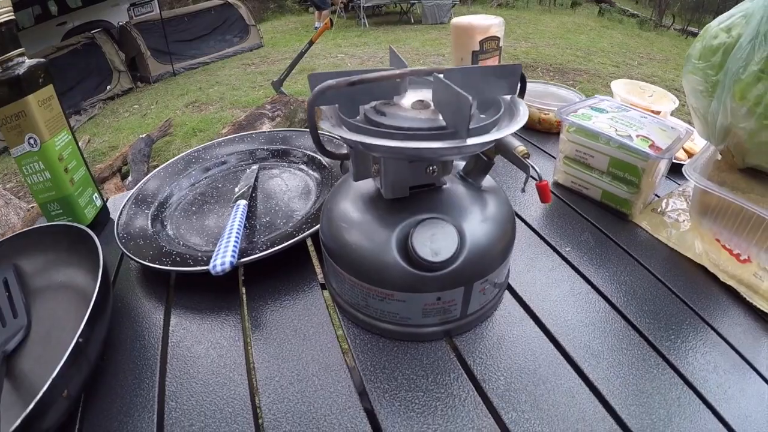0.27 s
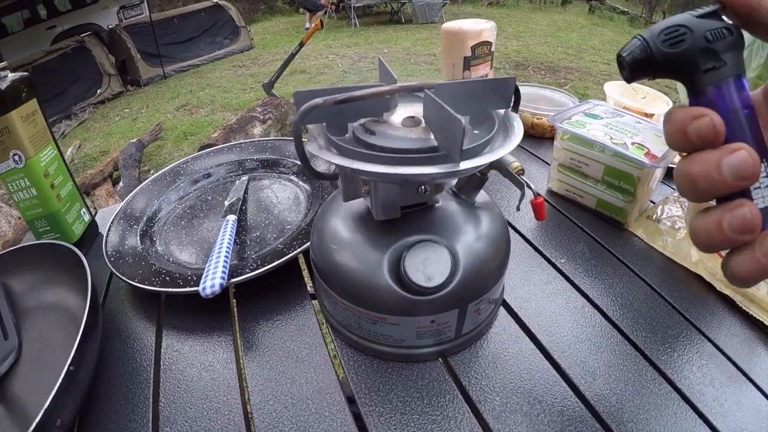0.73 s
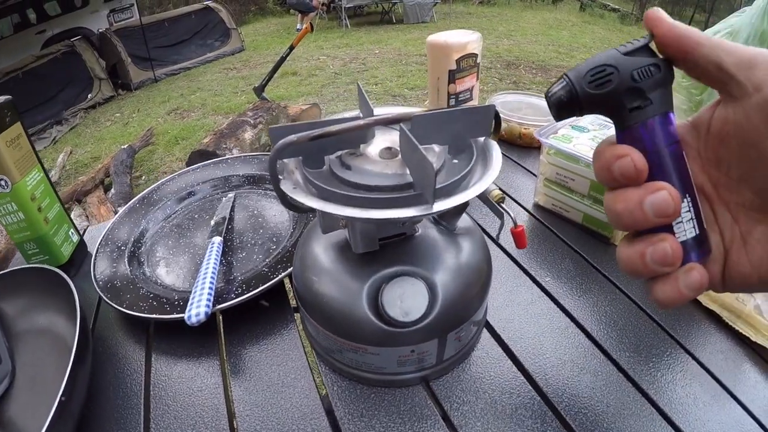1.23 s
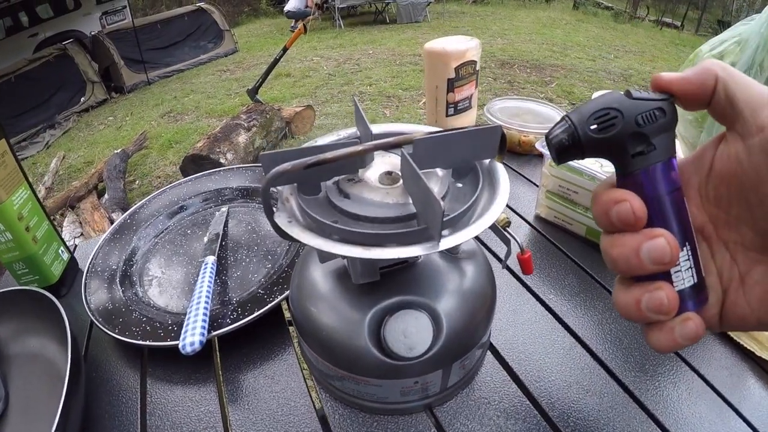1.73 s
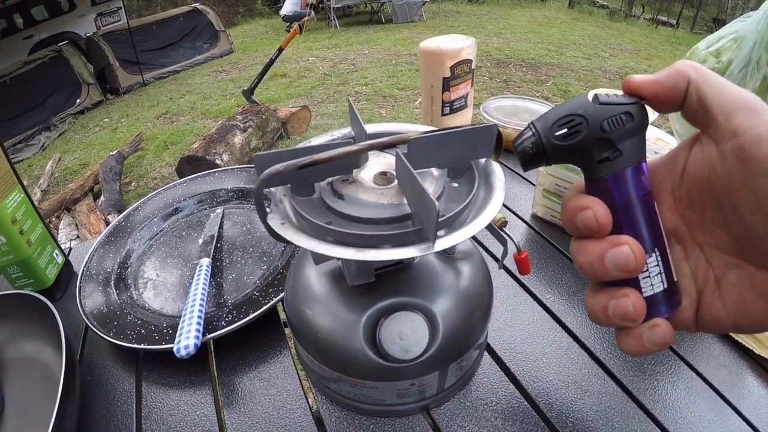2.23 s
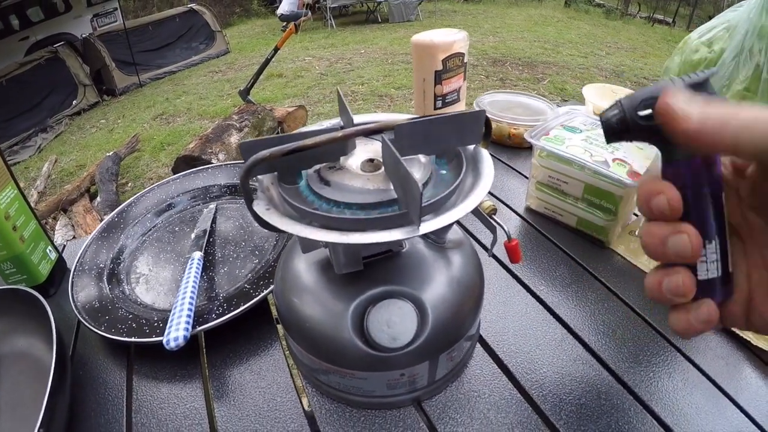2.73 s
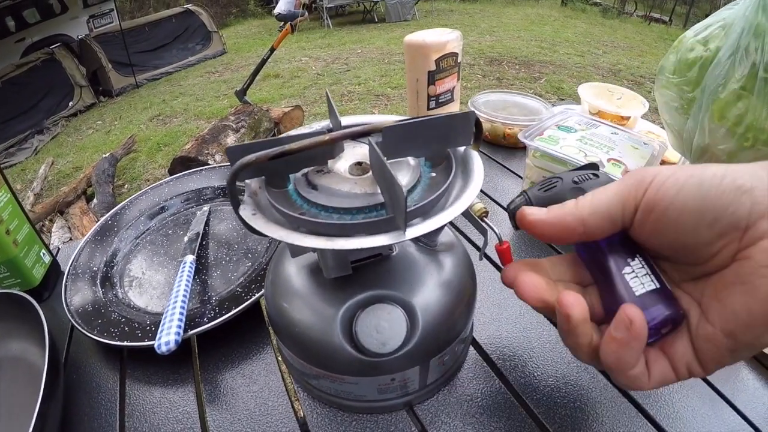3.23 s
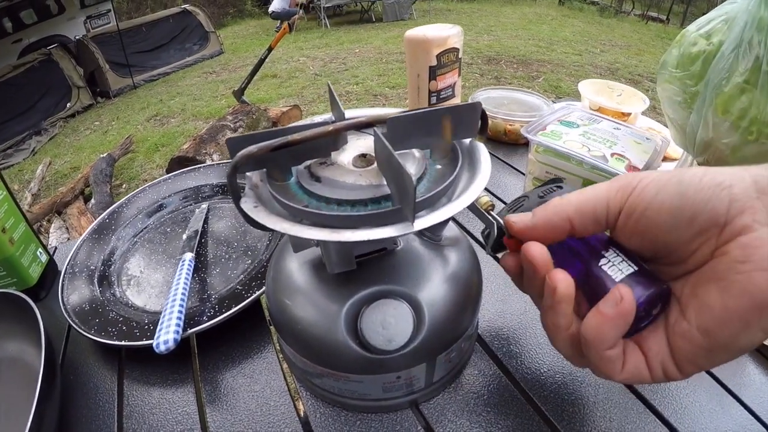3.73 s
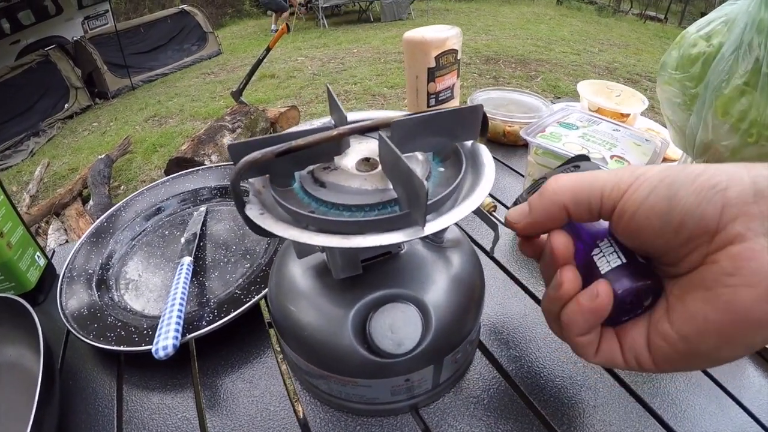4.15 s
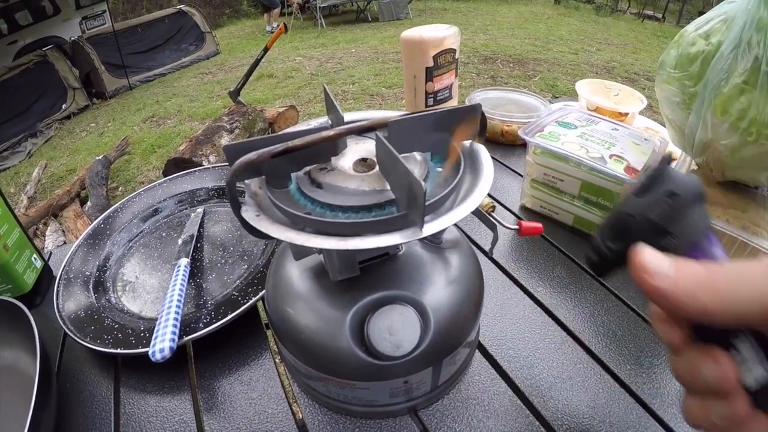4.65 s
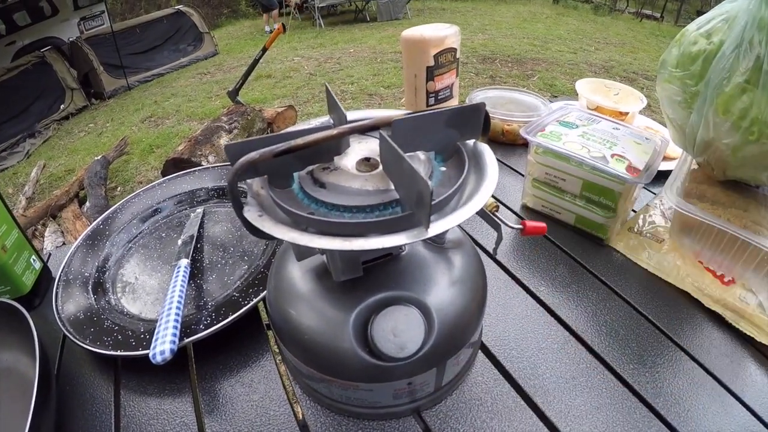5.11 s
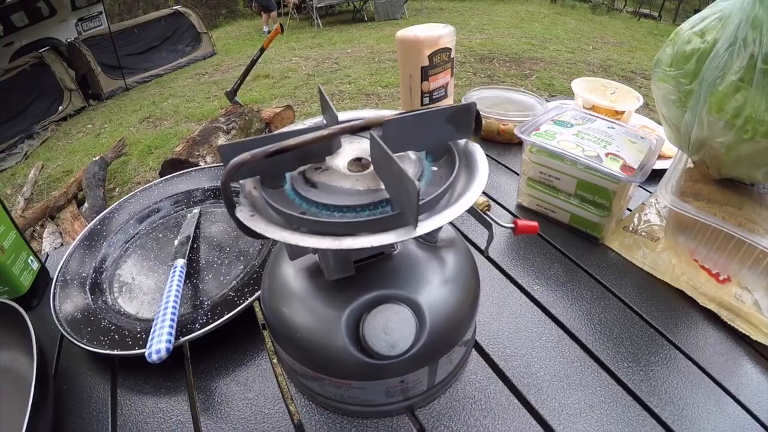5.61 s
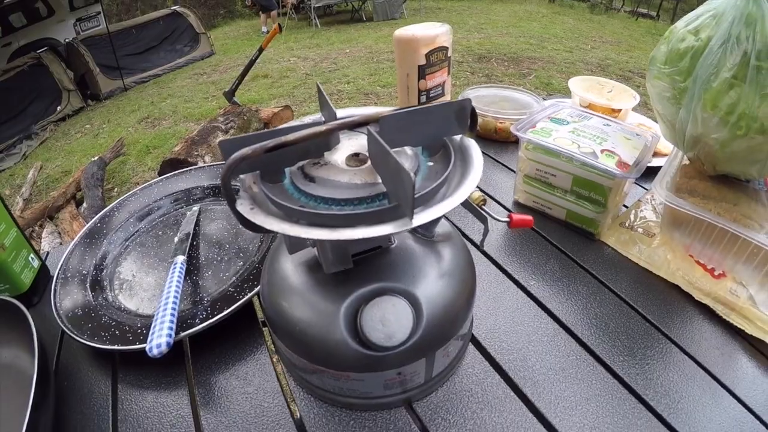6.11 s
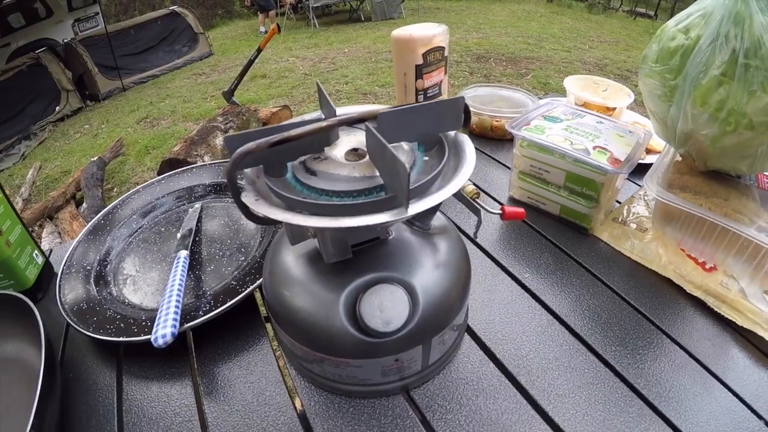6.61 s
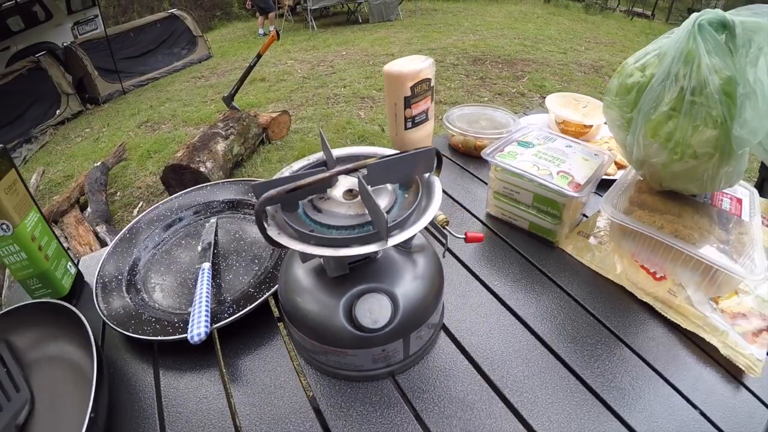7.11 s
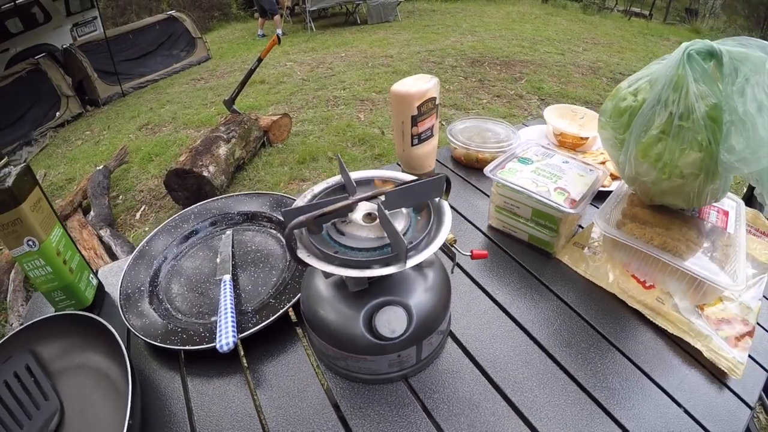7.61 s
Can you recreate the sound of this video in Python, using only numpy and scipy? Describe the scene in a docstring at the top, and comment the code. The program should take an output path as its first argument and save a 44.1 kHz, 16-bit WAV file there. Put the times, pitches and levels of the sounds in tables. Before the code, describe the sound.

Outdoors, very near a hand-held microphone, a camp stove lets out a continuous, slightly sputtering gas hiss over low hand rumble and a light breeze. Two crisp lighter clicks snap, then the burner lights with a dull puff and settles into a low flutter. The hiss sharpens briefly as the valve is turned. Finally the microphone moves away, the flame grows quieter, and a few soft handling knocks sound.

```python
"""A gas camping stove on a slatted table, close to a hand-held camera's microphone, nearly mono.
From the start gas hisses from the nozzle, swelling in places; the hand rumbles, air brushes past.
At 1.0 and 1.4 s a jet lighter clicks beside the burner, and the camera's limiter ducks after the clicks.
At 2.3 s the gas catches with a puff and burns on with a low flutter; near 4 s the valve is turned.
From 6.8 s the camera draws back, the flame fades, and fingers knock on the case."""
import sys
import numpy as np
from scipy import signal
from scipy.fft import rfft, irfft, next_fast_len
from scipy.io import wavfile
from scipy.ndimage import uniform_filter1d, minimum_filter1d, map_coordinates

SR = 44100
rng = np.random.default_rng(int(sys.argv[2]) if len(sys.argv) > 2 else 0)


def log_audio(samples):
    """Write samples as a 16-bit WAV file to the path given in sys.argv[1]."""
    # one column per channel
    frames = np.atleast_2d(samples).T
    # limit to full scale, then quantise
    limited = np.clip(frames, -1, 1)
    pcm = np.round(limited * 32767).astype(np.int16)
    wavfile.write(sys.argv[1], SR, pcm)


N = 346626
TIME = np.arange(N) / SR

# escaping gas at the microphone, before each layer's trim: (time [s], rush [dB], jet [dB], fizz [dB])
GAS_LEVELS = [(0.0, -38.5, -33, -52.5), (0.4, -37, -31.5, -50.5), (0.62, -37.5, -34, -52),
              (0.92, -36.5, -31, -52.5), (1.15, -39.5, -31, -50.5), (1.4, -38, -33.5, -53.5),
              (1.84, -37.5, -36, -52.5), (2.3, -38.5, -32, -52.5), (2.48, -39.5, -38, -54),
              (2.62, -41, -34.5, -52), (2.9, -41, -37, -54), (3.46, -44, -39, -55), (4.07, -42, -35.5, -55),
              (4.31, -43, -36, -53.5), (4.77, -44, -37, -56.5), (5.23, -44, -38, -56),
              (5.82, -40.5, -38, -55.5), (6.22, -41.5, -39.5, -53.5), (6.55, -41.5, -40, -56.5),
              (6.89, -41.5, -38.5, -56), (7.49, -44, -43.5, -59), (7.86, -46, -42, -59)]
# the mixing tube's hum, strongest with the microphone close to the burner: (time [s], level [dB])
HUM_LEVELS = [(0, -51), (.6, -52), (1.2, -51), (1.7, -47.5), (2.3, -45.5), (3.2, -49), (5.6, -48.5),
              (7.0, -53.5), (7.86, -50)]
# the colours of the gas, each (frequency [Hz], relative density [dB])
TUBE_SPECTRUM = [(1120, -17.5), (1300, 1.5), (1440, 4), (1600, 0.5), (1750, -8), (2100, -42)]  # the mixing tube's main resonance
HUM_SPECTRUM = [(220, -1.5), (330, -8.5), (390, -4), (490, -14.5), (545, -25), (600, -25), (650, -20),
                (720, -12.5), (950, -14), (1120, -25)]  # its low hum
RUSH_SPECTRUM = [(1550, -27), (1800, -0.5), (2000, 4), (2400, 1.5), (2750, -2), (3050, 0.5), (3350, -4),
                 (3650, 1), (4300, -2), (5200, -14)]  # the broad rush
JET_SPECTRUM = [(3600, -60), (4300, -12), (4600, 0.5), (5400, 1.5), (5950, 1), (6250, -3.5), (6600, -4.5),
                (7200, -15), (8500, -54)]  # the nozzle's hiss
FIZZ_SPECTRUM = [(6000, -23), (7200, 4.5), (7900, 6.5), (9300, 1), (10050, 6), (10700, -5), (12500, -2.5),
                 (13400, -10), (14400, -3), (15250, -1.5)]  # the fizz above it
SIDE_FIZZ_SPECTRUM = [(9500, -30), (11000, -10), (12500, 7), (13500, 2), (15200, 8)]  # the highest fizz, which differs between left and right
VALVE_SPECTRUM = [(6500, -27), (6950, -1), (7550, -2), (8000, -2), (8900, -24), (13500, -30), (14300, -13),
                  (15200, -14)]  # the valve's thin hiss
# the jet's brightest ring, heard from the camera: (time [s], centre [Hz], strength [0-1])
JET_RING = [(0, 5330, 0.7), (.45, 5320, 0.6), (.65, 5480, 0.1), (.95, 5440, 0.8), (1.3, 5320, 0.8),
            (1.6, 5240, 0.5), (1.85, 5650, 0.3), (2.15, 5800, 1), (2.7, 5680, 0.5), (3.0, 5530, 0.1),
            (4.2, 5480, 0.5), (4.7, 5900, 0.13), (5.3, 5600, 0.4), (5.9, 5400, 0.2), (6.8, 5470, 0.1),
            (7.3, 5420, 0.6), (7.86, 5650, 0.5)]
# short paths off table and pan support: (time [s], first delay [ms], second delay [ms], strength [0-1])
TABLE_ECHOES = [(0, 0.97, 1.27, 0.09), (1.3, 0.76, 1.15, 0), (2.1, 0.94, 0.98, 0.09),
                (3.5, 0.94, 1.24, 0.04), (4.5, 0.685, 1.07, 0), (6.2, 0.91, 1.09, 0.07),
                (7.86, 0.89, 1.38, 0.17)]
# bands that reflections cancel: (middle [s], length [s], centre [Hz], half-width [Hz], depth [0-1])
HISS_NOTCHES = [(.6, 2.4, 4740, 110, 0.63), (.7, 1.3, 3440, 200, 0.53), (2.1, 0.86, 5140, 200, 0.15),
                (3.7, 1.6, 6200, 170, .35), (5.4, 3.2, 4400, 130, 0.27), (6.2, 2.5, 3270, 150, 0.35),
                (6.95, 1.16, 4140, 170, 0.6)]
# bands of the hiss that swell and fade: (middle [s], length [s], level [dB], centre [Hz], width [Hz])
NOZZLE_SWELLS = [(.2, 2.2, -43, 2790, 450), (0.415, 0.13, -29, 5490, 231.5), (2.655, 0.14, -31, 5650, 710),
                 (2.75, 0.066, -30, 5650, 220), (3.374, 0.28, -37.5, 5480, 300),
                 (3.797, 1.3, -47.5, 3040, 190), (4.69, 0.18, -43, 3985, 35), (6.788, 0.16, -36, 5560, 500),
                 (7.77, .14, -42.5, 5700, 400)]

# the hand's rumble on the camera: (frequency [Hz], relative density [dB])
GRIP_SPECTRUM = [(8, -13), (20, 4.5), (35, 2.5), (52, 2), (75, 2), (100, -9.5), (150, -33), (300, -42)]
# the hand shifts and the drone swells: (middle [s], length [s], level [dB], pitch [Hz])
GRIP_SHIFTS = [(0.338, 0.37, -23, 52.2), (0.994, 0.15, -18, 58), (1.102, 0.24, -21, 50),
               (1.355, 0.31, -26.5, 72.7), (2.232, 0.19, -21, 56.5), (4.87, 0.2, -24, 48.5),
               (5.566, 0.14, -17.5, 48.94), (6.013, 0.28, -18.5, 47.1), (6.745, 0.29, -20, 48)]
# air on the microphone: (frequency [Hz], relative density [dB])
BREEZE_SPECTRUM = [(50, -9), (85, 0.5), (120, -2), (170, -6), (240, -21), (400, -25.5)]
# its separate puffs: (time [s], level [dB])
BREEZE_PUFFS = [(.1, -36), (.18, -36), (.39, -36), (.56, -37.5), (.84, -38), (.9, -35), (1.0, -28.5),
                (1.11, -35), (1.55, -32), (1.62, -35.5), (1.86, -31), (1.95, -31), (2.06, -32), (2.23, -37)]
# knocks on the camera's case: (time [s], level [dB])
CASE_KNOCKS = [(0.093, -34), (7.506, -21.5), (7.666, -22), (7.799, -33)]
# the case's resonances: (frequency [Hz], level [dB], t60 [s])
CASE_MODES = [(169, -4, .05), (369, 2.5, 0.048), (730, -2, 0.022), (960, -9, 0.03)]
# dull pushes of air and hand: (time [s], level [dB], pitch [Hz], t60 [s], rise [s])
DULL_THUMPS = [(0.099, 0, 47.7, 0.082, 0.011), (0.817, -8.5, 55, 0.098, 0.0059),
               (1.434, 3, 74, 0.082, 0.004), (2.263, -3, 60, 0.067, 0.0066),
               (2.311, -4.5, 76.6, 0.1, 0.0085), (2.315, -14.5, 200, 0.037, 0.0038),
               (2.395, 8, 66.4, 0.049, 0.0089), (7.347, 2.5, 68, 0.16, 0.019),
               (7.666, -8.5, 81, .06, 0.0047), (7.701, -13, 61, 0.098, 0.0064)]

# the lighter's trigger is pressed:
# (snap time [s], snap level [dB], housing level [dB], slide peak [s], slide level [dB], rise [dB/s])
TRIGGER_PRESSES = [(0.966, 5, -15, 0.962, -11.5, 900), (1.4352, 6, -5.5, 1.4295, -13, 1300)]
# the sliding trigger's squeak: (pitch [Hz], waver [Hz], level [dB])
SQUEAK_TONES = [(4260, 200, -6), (5230, 90, 0.5), (6100, 198, -13), (7500, 230, -21), (8930, 160, -14)]
# the snap's dry crack: (frequency [Hz], relative density [dB])
CRACK_SPECTRUM = [(1300, -14), (2000, -4.5), (3000, -4), (4000, -2), (5500, 2), (7000, 3.5), (9000, -1.5),
                  (10200, -9.5), (12000, -21), (15000, -25)]
# the lighter's metal nozzle and plastic housing, each (frequency [Hz], level [dB], t60 [s])
LIGHTER_NOZZLE_MODES = [(4360, -17, 0.041), (5250, -2.5, 0.028), (6040, -10, 0.026), (7040, -17, 0.02),
                        (7900, -20, .02), (8860, -14.5, 0.025)]
HOUSING_MODES = [(400, -23, .018), (1950, -10, 0.009), (2690, -1, 0.0088), (3330, -4, 0.012)]
# the trigger is let go: (time [s], level [dB])
TRIGGER_RELEASES = [(1.1906, -11.5), (2.571, -12.5)]
# its small returning tick: (frequency [Hz], relative density [dB])
TICK_SPECTRUM = [(1300, -10), (1800, 0), (2800, -15), (4000, -6), (4700, -16), (5600, 8), (7000, -12),
                 (8100, -5), (9500, -21), (14000, -34)]
# the flame's low roar: (frequency [Hz], relative density [dB])
FLAME_SPECTRUM = [(25, -14), (60, -6.5), (110, -2), (190, -0.5), (240, -5.5), (300, -13.5), (350, -17.5),
                  (400, -16.5), (450, -26), (505, -25), (550, -49), (600, -37.5), (680, -33), (900, -43),
                  (1200, -65)]

LEAD = 64  # samples of room for a crack's soft onset


def amp(db):
    """Decibels to amplitude."""
    return 10 ** (np.asarray(db) / 20)


def unit(x):
    """x scaled to rms 1."""
    return x / np.sqrt(np.mean(x ** 2) + 1e-20)


def along(points, hz):
    """(frequency [Hz], level [dB]) points joined on a log axis, silent far beyond both ends."""
    f, db = np.transpose(points)
    edges = np.r_[f[0] / 2, f, f[-1] * 2]
    return np.interp(np.log(hz + 1), np.log(edges), np.r_[-120, db, -120])


def curves(rows, at=TIME):
    """Each column after the time, joined by straight lines."""
    times, *columns = np.transpose(rows)
    return [np.interp(at, times, column) for column in columns]


def wobble(rate):
    """A smooth random curve, rate knots a second."""
    return map_coordinates(rng.standard_normal(int(N * rate / SR) + 4), [TIME * rate])


def swell(middle_s, length_s):
    """A smooth rise and fall, 1 at its middle."""
    return np.cos(np.pi * np.clip((TIME - middle_s) / length_s, -.5, .5))


def filtered(x, response):
    """x through a frequency response."""
    size = next_fast_len(len(x) + 8192)
    return irfft(rfft(x, size) * response(np.fft.rfftfreq(size, 1 / SR)), size)[:len(x)]


def noise(spectrum):
    """Coloured noise of rms 1."""
    return unit(filtered(rng.standard_normal(N), lambda hz: amp(along(spectrum, hz))))


def add(track, s, sound):
    """Mix a sound in at time s."""
    part = track[round(s * SR):][:len(sound)]
    part += sound[:len(part)]


def wavering(hz, waver_hz, rate):
    """A tone of unsteady pitch."""
    return np.sin(2 * np.pi * np.cumsum(hz + waver_hz * wobble(rate)) / SR)


def ringing(modes, t):
    """A struck body's modes, each dying at its own speed."""
    return sum(amp(db - 60 * t / t60) * np.sin(2 * np.pi * hz * t) for hz, db, t60 in modes)


def burst(spectrum, t60):
    """A short coloured crack of noise that starts near rms 1 after LEAD samples."""
    t = np.arange(SR // 20) / SR
    decay = amp(-60 * t / t60)
    white = np.pad(rng.standard_normal(len(t)) * decay, (LEAD, 0))
    crack = filtered(white, lambda hz: amp(along(spectrum, hz)))
    return crack * np.linalg.norm(decay) / np.linalg.norm(crack)


def gas():
    """Close by, gas rushes from the nozzle through the mixing tube; the flow sputters slightly."""
    rush_db, jet_db, fizz_db = curves(GAS_LEVELS)
    hum_db, = curves(HUM_LEVELS)
    sputter = wobble(30)
    drive_db = rush_db + hum_db
    tube_db = -43.5 + 0.45 * (drive_db - drive_db.mean())  # the resonance follows rush and hum
    tube = amp(tube_db + .5 * sputter) * noise(TUBE_SPECTRUM)
    hum = amp(hum_db + .5 * sputter) * noise(HUM_SPECTRUM)
    rush = amp(rush_db + 0.2 + .5 * sputter + 0.19 * wobble(14)) * noise(RUSH_SPECTRUM)
    hiss_gain = amp(jet_db + 0.32 + 0.52 * sputter + 1.42 * wobble(110) + 0.43 * wobble(8.1))
    hiss = hiss_gain * jet(ring_width_hz=150, ring_gain=2.5)
    fizz_gain = amp(fizz_db + 3 + sputter + 1.3 * wobble(22))
    fizz = fizz_gain * noise(FIZZ_SPECTRUM)
    direct = turbulence(tube + hum + rush + hiss + fizz, depth_db=2.0)
    mid = reflection_notches(table_echoes(direct))
    side = amp(-11.5) * fizz_gain * noise(SIDE_FIZZ_SPECTRUM)
    return mid + np.outer([1, -1], side)


def jet(ring_width_hz, ring_gain):
    """The nozzle's hiss with one narrow, wandering resonance."""
    hz, t, bands = signal.stft(noise(JET_SPECTRUM), SR, nperseg=512)
    centre, strength = curves(JET_RING, t)
    lift = 1 + ring_gain * strength / (1 + (2 * (hz[:, None] - centre) / ring_width_hz) ** 2)
    power = amp(along(JET_SPECTRUM, hz))[:, None] ** 2
    lift /= np.sqrt((power * lift ** 2).sum(0) / power.sum())  # the ring adds colour, not power
    return unit(signal.istft(bands * lift, nperseg=512)[1][:N])


def turbulence(x, depth_db, blur_bins=10, blur_frames=14):
    """Turbulence lifts and sinks narrow bands of the hiss for moments."""
    bands = signal.stft(x, nperseg=1024)[2]
    blur = np.outer(np.hanning(blur_bins), np.hanning(blur_frames))
    white = rng.standard_normal(np.add(bands.shape, blur.shape) - 1)
    ripple = unit(signal.fftconvolve(white, blur, "valid"))
    reach = np.minimum(np.linspace(0, 1, len(bands))[:, None] / .13, 1)  # shallower in the low bands
    return signal.istft(bands * amp(depth_db * reach * ripple), nperseg=1024)[1][:N]


def table_echoes(x):
    """Two short echoes off table and pan support comb the hiss; the comb shifts as the camera moves."""
    *delays_ms, strength = curves(TABLE_ECHOES)
    echoes = sum(map_coordinates(x, [np.arange(N) - ms * SR / 1000]) for ms in delays_ms)
    return x + strength * echoes


def reflection_notches(x):
    """Reflections cancel narrow bands of the hiss, each while the microphone stays in one place."""
    for s, length_s, hz, half_width_hz, depth in HISS_NOTCHES:
        band = filtered(x, lambda f: 1 / (1 + ((f - hz) / half_width_hz) ** 4))
        x = x - depth * np.minimum(2 * swell(s, length_s), 1) * band
    return x


def nozzle_swells():
    """Bands of the hiss swell and fade, some as broad airy flares, some as thin whistles."""
    out = np.zeros(N)
    for s, length_s, db, hz, width_hz in NOZZLE_SWELLS:
        band = filtered(rng.standard_normal(N), lambda f: 1 / (1 + ((f - hz) / width_hz) ** 2) ** 2)
        out += amp(db) * swell(s, length_s) * unit(band)
    return out


def grip(rumble_db, drone_db, drone_hz):
    """Handling noise: the hand rumbles on the camera, and a low drone swells whenever it shifts."""
    out = amp(rumble_db + 0.64 * wobble(7.4)) * noise(GRIP_SPECTRUM)
    out += amp(drone_db + 2.9 * wobble(3.2)) * wavering(drone_hz, waver_hz=2.03, rate=12)
    for s, length_s, db, hz in GRIP_SHIFTS:
        out += amp(db) * swell(s, length_s) * wavering(hz, waver_hz=2.03, rate=12)
    return out


def breeze(level_db, puff_s):
    """Light air brushes the microphone, with separate soft puffs."""
    puffs = sum(amp(db) * swell(s, puff_s) for s, db in BREEZE_PUFFS)
    return (amp(level_db + 3.7 * wobble(13)) + puffs) * noise(BREEZE_SPECTRUM)


def knocks_and_thumps(knock_rise_s):
    """Right at the microphone, a soft fingertip rings the case; pushes of air and hand thump dully."""
    out, t = np.zeros(N), np.arange(SR // 4) / SR
    knock = (1 - np.exp(-t / knock_rise_s)) * ringing(CASE_MODES, t)
    for s, db in CASE_KNOCKS:
        add(out, s, amp(db) * knock)
    for s, db, hz, t60, rise_s in DULL_THUMPS:
        onset = 1 - np.exp(-(t / rise_s) ** 2)
        add(out, s, onset * ringing([(hz, db, t60)], t))
    return out


def trigger_squeak(rough_db, waver_rate):
    """Plastic rubbing on plastic sings in a few wavering, rough tones."""
    return unit(sum(amp(db + rough_db * wobble(waver_rate)) * wavering(hz, waver_hz, waver_rate)
                    for hz, waver_hz, db in SQUEAK_TONES))


def lighter(low_cut_hz, ring_rise_s, slide_fall_db_per_s):
    """Beside the burner the trigger slides, snaps and rings nozzle and housing; let go, it ticks back."""
    bright, housing, t = np.zeros(N), np.zeros(N), np.arange(SR // 20) / SR
    squeak = trigger_squeak(rough_db=3.5, waver_rate=700)
    onset = 1 - np.exp(-t / ring_rise_s)
    nozzle = np.pad(onset * ringing(LIGHTER_NOZZLE_MODES, t), (LEAD, 0))
    for s, snap_db, housing_db, peak_s, slide_db, rise_db_per_s in TRIGGER_PRESSES:
        # the squeak swells, then eases just before the snap
        swell_db = np.minimum(rise_db_per_s * (TIME - peak_s), slide_fall_db_per_s * (peak_s - TIME))
        bright += amp(slide_db + swell_db) * squeak
        crack = amp(-4) * burst(CRACK_SPECTRUM, t60=0.012)
        add(bright, s - LEAD / SR, amp(snap_db) * (crack + nozzle))
        add(housing, s, amp(housing_db) * onset * ringing(HOUSING_MODES, t))
    for s, db in TRIGGER_RELEASES:
        tick = burst(TICK_SPECTRUM, t60=.011)
        add(bright, s - LEAD / SR, amp(db) * (tick + amp(-13) * nozzle))
    low_cut = signal.butter(2, low_cut_hz, "high", fs=SR, output="sos")
    return housing + signal.sosfilt(low_cut, bright)


def spring(ring_hz, ring_db, t60):
    """The last snap leaves the lighter's spring ringing faintly."""
    out, t = np.zeros(N), np.arange(SR // 2) / SR
    last_snap_s = TRIGGER_PRESSES[-1][0]
    add(out, last_snap_s, ringing([(ring_hz, ring_db, t60)], t))
    return out


def flame(light_s, catch_s, level_db, draw_back_s):
    """The pooled gas catches at once; the turbulent flame flutters in uneven puffs and slowly calms."""
    age = np.maximum(TIME - light_s, 0)
    catch = np.minimum(age / catch_s, 1)
    flare_db = 3.5 * np.exp(-age / 0.06)
    calming_db = 0.32 * age
    distance_db = 4 * np.maximum(TIME - draw_back_s, 0)  # the microphone draws away
    puffs = amp(2.0 * wobble(42) + 0.77 * wobble(9))
    flutter = unit(puffs * noise(FLAME_SPECTRUM))
    return catch * amp(level_db + flare_db - calming_db - distance_db) * flutter


def valve(middle_s, length_s, level_db):
    """Turning the valve briefly sharpens the hiss."""
    return amp(level_db) * swell(middle_s, length_s) * noise(VALVE_SPECTRUM)


def scene():
    """Everything is close to the microphone and central; only the highest fizz has width."""
    return (gas()
            + nozzle_swells()
            + grip(rumble_db=-29.5, drone_db=-34, drone_hz=49.9)
            + breeze(level_db=-44, puff_s=0.074)
            + knocks_and_thumps(knock_rise_s=0.0016)
            + lighter(low_cut_hz=1600, ring_rise_s=0.00067, slide_fall_db_per_s=1700)
            + spring(ring_hz=8330, ring_db=-43, t60=.5)
            + flame(light_s=2.311, catch_s=0.009, level_db=-24.5, draw_back_s=6.8)
            + valve(middle_s=3.91, length_s=0.93, level_db=-47.5))


def limiter(x, ceiling, half_attack_s, hold_s, release_s):
    """Peaks over the ceiling pull the gain down just ahead of them; it holds briefly, then recovers."""
    excess = np.log(np.maximum(np.abs(x).max(0) / ceiling, 1)) + 1e-12
    fall = TIME / release_s
    reduction = np.exp(np.maximum.accumulate(np.log(excess) + fall) - fall)  # decays exponentially
    half_hold = round(hold_s * SR / 2)
    held = minimum_filter1d(np.exp(-reduction), 2 * half_hold + 1, origin=half_hold)
    span = round(half_attack_s * SR)
    ahead = minimum_filter1d(held, 2 * span)
    return x * uniform_filter1d(uniform_filter1d(ahead, span), span)


def record(dry):
    """The camera limits the clicks and keeps nothing above its band limit."""
    limited = limiter(dry, ceiling=0.9, half_attack_s=.0012, hold_s=0.024, release_s=0.03)
    return np.array([filtered(channel, lambda hz: hz < 15330) for channel in limited])


dry = scene()
out = record(dry)
log_audio(out)
```